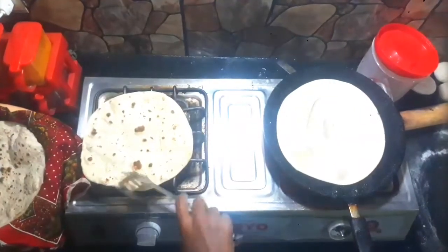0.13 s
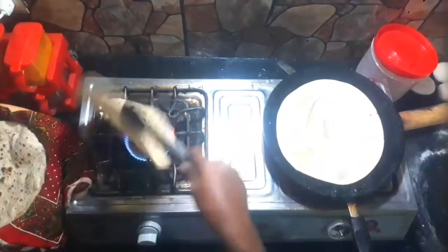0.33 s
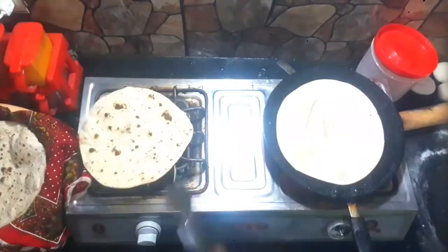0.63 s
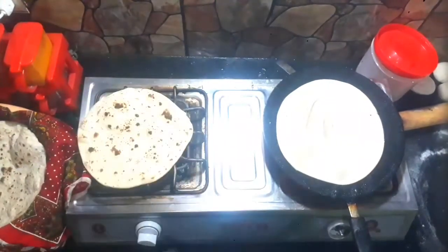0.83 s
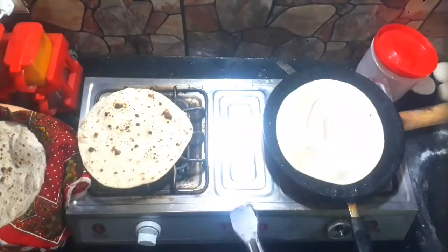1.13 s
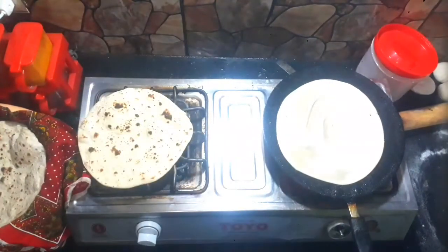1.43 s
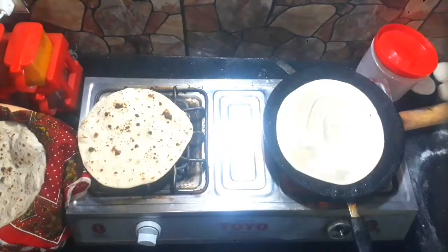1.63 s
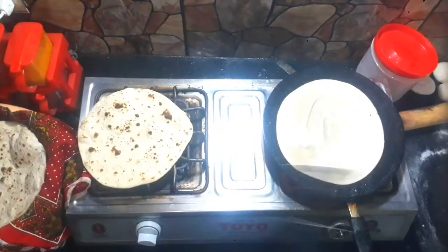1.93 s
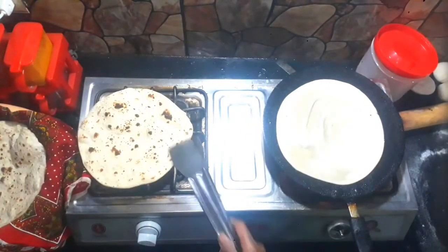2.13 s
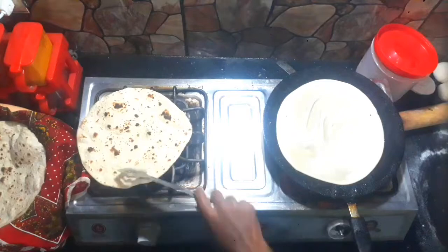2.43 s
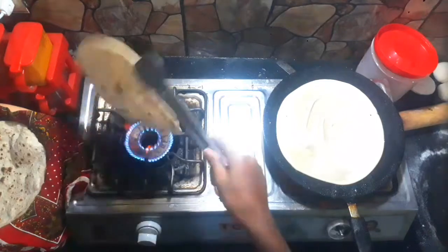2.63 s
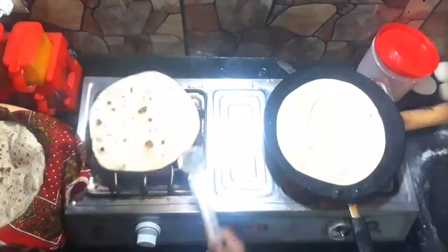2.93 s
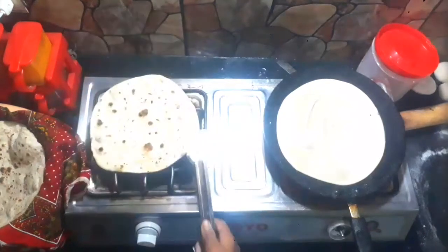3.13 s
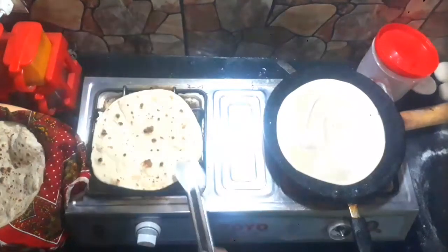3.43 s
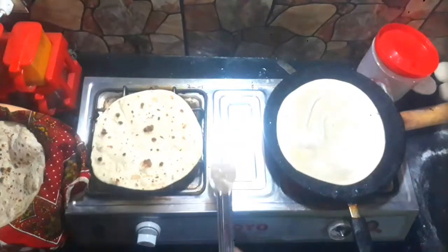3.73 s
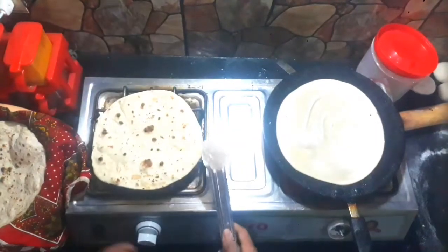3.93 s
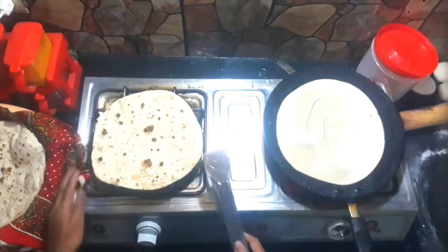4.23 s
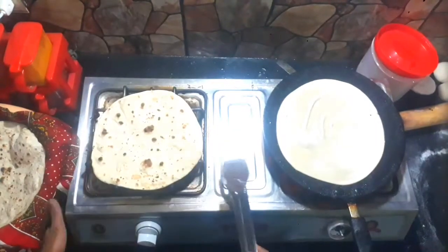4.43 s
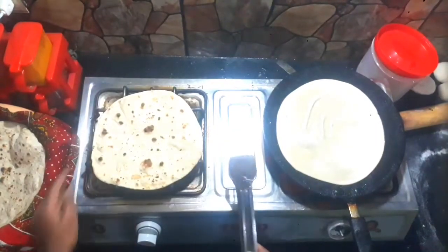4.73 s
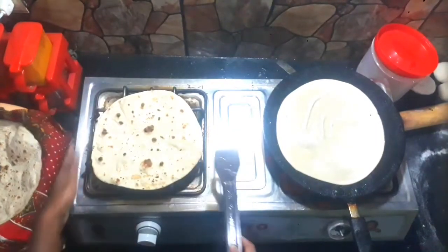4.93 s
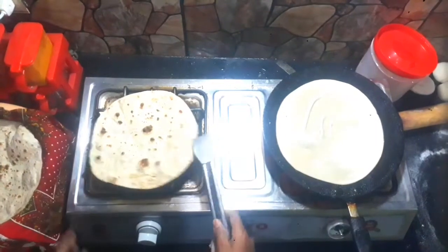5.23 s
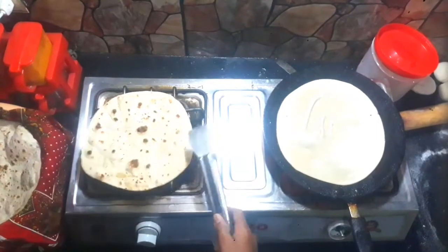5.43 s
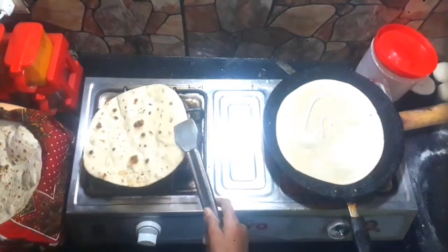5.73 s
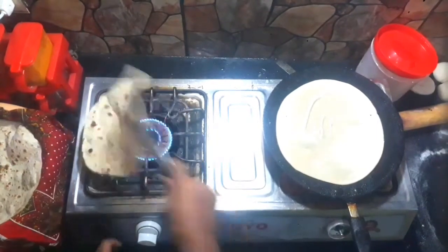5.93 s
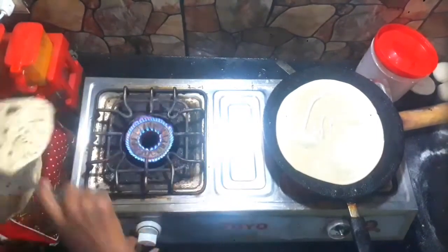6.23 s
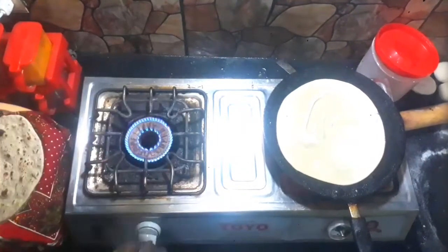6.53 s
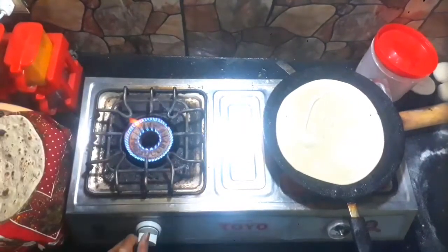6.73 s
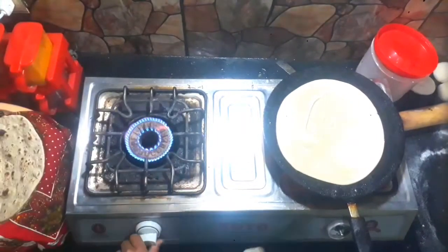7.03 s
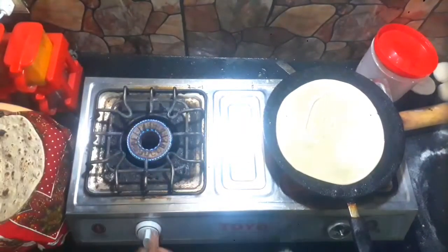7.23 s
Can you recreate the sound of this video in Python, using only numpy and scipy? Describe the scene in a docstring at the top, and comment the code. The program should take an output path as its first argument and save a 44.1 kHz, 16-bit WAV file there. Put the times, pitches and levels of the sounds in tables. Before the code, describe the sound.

In a small hard kitchen, steel tongs snip, tap and clatter on a sheet-metal stove over faint flame hiss, ending with hollow knocks.

```python
"""Steel tongs at a gas stove

Tongs tap the grate of a sheet-steel stove in a small hard-walled kitchen, snip and are laid down once;
blows are modal ringing plus shaped noise with a room tail. Ticks, bumps, rubs and nudges come between;
late on, the gas knob clicks and the stove is knocked. Filtered noise is the flame, a sine the faint hum.
A close double pop overloads the microphone; the gain control takes seconds to recover."""
import sys
import numpy as np
from scipy import signal
from scipy.fft import rfft, irfft, next_fast_len
from scipy.io import wavfile

SR = 44100
rng = np.random.default_rng(int(sys.argv[2]) if len(sys.argv) > 2 else 0)


def generate_wav(signal):
    """Clip the signal to [-1, 1] and save it as 16-bit WAV at the path in sys.argv[1]."""
    frames = np.transpose(np.atleast_2d(signal))
    scaled = np.clip(frames, -1, 1) * 32767
    pcm = np.round(scaled).astype(np.int16)
    wavfile.write(sys.argv[1], SR, pcm)


N = 325017
TIME = np.arange(N) / SR
AGE = np.arange(24000) / SR   # s since the start of one event


def from_db(db):
    """Decibels to gain."""
    return 10 ** (np.asarray(db) / 20)


def at_hz(points, hz):
    """Read a table on a log-frequency axis."""
    f, value = np.transpose(points)
    return np.interp(np.log(np.maximum(hz, 1)), np.log(f), value)


def dying(t60_s):
    """Exponential envelope that falls 60 dB in t60_s."""
    return np.exp(-np.log(1000) / t60_s * AGE)


def unit(x):
    """Scale a blow to the energy of 50 ms at rms 1."""
    return x / np.sqrt(np.sum(x ** 2) / (SR / 20) + 1e-20)


def band(x, hz, kind, order=2):
    """Butterworth filter."""
    return signal.sosfilt(signal.butter(order, hz, kind, fs=SR, output="sos"), x)


def add(out, s, sound):
    """Mix a sound in at time s, cut at the end of the scene."""
    at = round(s * SR)
    out[at:at + len(sound)] += sound[:N - at]


def reflections(count, depth=0.57, step_s=0.01082):
    """Random gain per partial for wall reflections that add and cancel: an uneven decay."""
    knots_s = np.arange(100) * step_s
    gains = 1 + depth * rng.standard_normal((count, len(knots_s)))
    return np.array([np.interp(AGE, knots_s, row) for row in gains])


def ringing(modes, spread_db, split=0.012, split_from_hz=2000):
    """One blow: modes of random strength and sign ring and decay; the high ones are detuned pairs."""
    hz, db, t60_s = np.transpose(modes)[:, :, None]
    sign = rng.choice([-1, 1], hz.shape)
    strength = sign * from_db(db + spread_db * rng.standard_normal(hz.shape))
    detune = split * (hz > split_from_hz) * rng.standard_normal((2, *hz.shape))
    swing = sum(np.sin(2 * np.pi * pair_hz * AGE) for pair_hz in hz * (1 + detune))
    partials = strength * swing * dying(t60_s) * reflections(len(modes))
    return unit(np.sum(partials, axis=0))


# kitchen tail: f/Hz, t60/s
ROOM_TAIL = [(200, 0.79), (600, 0.57), (1400, 0.61), (4000, 0.58), (9000, 0.41), (15000, 0.37)]


def crash(colour, direct, direct_t60_s, uneven_db=3.5, spacing_hz=22):
    """Crowded modes as unevenly coloured noise: a direct burst plus a room tail that dies band by band."""
    hz = np.arange(len(AGE) // 2 + 1) * SR / len(AGE)
    uneven = np.interp(hz / spacing_hz, np.arange(len(hz)), rng.standard_normal(len(hz)))
    gain = from_db(at_hz(colour, hz) + uneven_db * uneven)
    spectrum = rfft(rng.standard_normal(len(AGE))) * gain
    burst = direct * dying(direct_t60_s)
    centres_hz, t60s_s = np.transpose(ROOM_TAIL)
    total = np.zeros(len(AGE))
    for share, t60_s in zip(np.eye(len(ROOM_TAIL)), t60s_s):
        part = irfft(spectrum * np.interp(hz, centres_hz, share))   # overlapping triangular bands
        total += part * (burst + dying(t60_s))
    return unit(total)


def favour(hz, pitches_hz, spot_db=9.5, width=0.091):
    """dB lift of what rings near the pitches of the struck spot; width in ln(f)."""
    return spot_db * sum(np.exp(-(np.log(hz / pitch_hz) / width) ** 2) for pitch_hz in pitches_hz)


# stove panel modes: f/Hz, relative level/dB, t60/s
STOVE_MODES = [(166.7, -14, 0.2), (329.5, -10, 0.47), (352.7, 1, 0.49), (390.7, -4, 0.34), (437, 1, 0.54),
               (510, -10.5, 0.41), (545, -0.5, 0.53), (613, -0.5, 0.13), (639, 0, 0.41), (807, -4.5, 0.57),
               (854, -6.5, 0.5), (1000, -5, 0.39), (1118, -4.5, 0.39), (1213, -5, 0.23), (1392, -9.5, 0.44),
               (1470, -16, 0.25), (1572, -9.5, 0.42), (1640, -13, 0.34), (1840, -12, 0.18),
               (2005, -15, 0.84), (2525, -24, 0.37), (2470, -22, 0.254), (3310, -16.5, 0.3),
               (4090, -11.5, 0.41), (5280, -10, 0.48), (5070, -20.5, 0.64), (6500, -36, 0.23),
               (7060, -16.5, .35), (8660, -22, 0.39), (9700, -18, 0.29)]
# crowded stove modes, spectrum: f/Hz, relative level/dB
STOVE_COLOUR = [(59, -65), (100, -12), (177, -7), (258, -12), (340, 1), (457, -10.5), (627, 2.5),
                (697, -5.5), (998, -6), (2930, -20), (6660, -25.5), (8230, -26.5), (10600, -23),
                (15500, -40.5)]


def panel_blow(pitches_hz, ring_db, knock, knock_t60_s=0.32, crowd_share=0.58):
    """Sheet steel answers with crowded and single modes, strongest at the start."""
    hz, db, t60_s = np.transpose(STOVE_MODES)
    modes = np.transpose([hz, db + favour(hz, pitches_hz), t60_s])
    grid_hz = np.geomspace(50, 16000, 300)
    colour_db = at_hz(STOVE_COLOUR, grid_hz) + crowd_share * favour(grid_hz, pitches_hz)
    crowd = crash(np.transpose([grid_hz, colour_db]), direct=0.47, direct_t60_s=0.09)
    blow = crowd + from_db(ring_db) * ringing(modes, spread_db=2.0)
    return blow * (1 + knock * dying(knock_t60_s))


def contact(blow, hardness_db, edge_db, body_hz=800, edge_hz=3100, swell_s=0.0055,
            clank_swell=0.3, edge_per_hardness=1.21):
    """Harder contact raises the grate's clank, and the bright edge even more, over the panel's body."""
    swell = 1 - np.exp(-AGE / swell_s)   # bending waves take a moment to fill the panel
    body = unit(band(blow * swell, body_hz, "low", order=4))
    clank = unit(band(blow * swell ** clank_swell, [body_hz, edge_hz], "band", order=3))
    edge = unit(band(blow, edge_hz, "high", order=4))
    edge_gain = from_db(edge_db + edge_per_hardness * hardness_db)
    return body + from_db(hardness_db) * clank + edge_gain * edge


# flame and room hiss, spectrum: f/Hz, relative level/dB
HISS_COLOUR = [(20, -21), (40, -3.5), (80, -1.5), (140, -4.5), (220, -5.5), (400, -6), (575, -9.5),
               (1230, -13), (2020, -15), (6370, -21.5), (8060, -26.5), (9800, -27), (11900, -22),
               (15500, -24)]
# faint hum before gain control: t/s, rms level/dB
HUM_LEVEL = [(1.5, -83), (2.59, -70), (3.7, -70), (3.76, -63), (4.47, -63), (4.68, -79), (4.74, -65),
             (5.37, -67), (5.75, -77)]


def flame_and_hum(hiss_db=-57, hum_hz=57.8, waver_rad=0.23, waver_hz=8):
    """Steady shaped noise of burner and room; a low sine with wavering phase and changing level."""
    size = 2 * next_fast_len(N // 2 + 1, real=True)
    hz = np.arange(size // 2 + 1) * SR / size
    hiss = irfft(rfft(rng.standard_normal(size)) * from_db(at_hz(HISS_COLOUR, hz)))[:N]
    slow = band(rng.standard_normal(N), waver_hz, "low")
    hum = np.sqrt(2) * np.sin(2 * np.pi * hum_hz * TIME + waver_rad * slow / slow.std())
    hum_db = np.interp(TIME, *np.transpose(HUM_LEVEL))
    return from_db(hiss_db) * hiss / hiss.std() + from_db(hum_db) * hum


# light metal contact, spectrum: f/Hz, relative level/dB
CLICK_COLOUR = [(400, -21), (1500, 3.5), (3000, -1.5), (4500, 0), (6500, 2), (11000, 1.5), (15500, 0.5)]


def small_clicks(rows, modes, ring_db, direct):
    """Light metal contacts: a sharp tick and a thin ring."""
    out = np.zeros(N)
    for s, db in rows:
        tick = crash(CLICK_COLOUR, direct, direct_t60_s=0.019)
        ring = from_db(ring_db) * ringing(modes, spread_db=5.5)
        add(out, s, from_db(db) * (tick + ring))
    return out


# tong tips touch: t/s, level/dB
TIP_TOUCHES = [(.647, -45), (.74, -49), (2.464, -43.5), (5.297, -51), (5.853, -53.5), (6.34, -64),
               (6.385, -64.5)]
# tong modes, also for laying down: f/Hz, relative level/dB, t60/s
TONG_MODES = [(3390, 11.5, 0.29), (4120, 15.5, 0.244), (5270, -12, 0.227), (6190, 18, 0.33),
              (6300, 9, 0.36), (6612, 20, 0.23), (6700, -2.5, 0.9), (6700, 3, 0.26), (7030, -23, 0.153),
              (7030, 1, 0.68), (7960, -11, 0.81), (8350, -15, 0.244), (9600, 6, 0.22), (10570, 17.5, 0.39),
              (11640, 16, 0.19)]


def tong_snips():
    """The tips of the tongs touch: a tick and the arms' thin ring."""
    return small_clicks(TIP_TOUCHES, TONG_MODES, ring_db=-11, direct=2.2)


# tongs on stove: t/s, level/dB, hardness/dB, panel f/Hz, tong f/Hz, second arm delay/s, its relative level/dB
STOVE_TAPS = [(.652, -43.5, -12, 534, 7300, .037, 5.5), (.775, -44, 9, 1670, 8800, .004, -20),
              (2.445, -38, -2, 1023, 6760, .019, 2.5), (2.914, -52, -3, 388, 6600, .061, -2.5),
              (3.467, -53.5, 2, 1110, 6600, .02, -11), (5.509, -43.5, -0.5, 1200, 3260, .068, -6.5),
              (5.852, -46, 0, 514, 4780, .008, 2.5)]


def stove_taps():
    """The two arms of the tongs strike the same spot one after the other."""
    out = np.zeros(N)
    for s, db, hardness_db, panel_hz, tong_hz, gap_s, second_db in STOVE_TAPS:
        for at_s, arm_db in ((s, db), (s + gap_s, db + second_db)):
            blow = panel_blow([panel_hz, tong_hz], ring_db=2.5, knock=0.32)
            add(out, at_s, from_db(arm_db) * contact(blow, hardness_db, edge_db=-7.0))
    return out


# close double pop: t/s, level/dB
DOUBLE_POP = [(.702, -12.5), (0.7061, 2.5)]
# damped pop swings: f/Hz, relative level/dB, t60/s
POP_SWINGS = [(130, -18, .028), (270, -5, 0.005), (490, -2, .0065), (1000, -10.5, .004),
              (2550, -14, 0.0037), (3700, -21, .005)]


def pops(flutter_hz=727, flutter_after_s=0.015, flutter_width_s=0.007, flutter_db=-32,
         rattle_db=3, rattle_hz=3200, crack_db=-18, crack_hz=9000, crack_t60_s=0.004, low_cut_hz=139.6):
    """Each pop is a crack, heavily damped swings and a rattle that swells and dies."""
    out = np.zeros(N)
    swings = sum(from_db(db) * np.sin(2 * np.pi * hz * AGE) * dying(t60_s) for hz, db, t60_s in POP_SWINGS)
    swell = from_db(flutter_db) * np.exp(-((AGE - flutter_after_s) / flutter_width_s) ** 2)
    flutter = np.sin(2 * np.pi * flutter_hz * AGE)
    for s, db in DOUBLE_POP:
        noise = rng.standard_normal(len(AGE))
        crack = from_db(crack_db) * band(noise, crack_hz, "low", order=1) * dying(crack_t60_s)
        rattle = flutter + from_db(rattle_db) * band(noise, rattle_hz, "low", order=4)
        add(out, s, from_db(db) * (crack + swings + rattle * swell))
    return band(out, low_cut_hz, "high")


# landing of each tong arm: t/s, level/dB
ARM_LANDINGS = [(1.1311, -26.5), (1.153, -28.5)]
# clash of the laid tongs, spectrum: f/Hz, relative level/dB
CLASH_COLOUR = [(71, -59), (120, -23.5), (216, -27), (312, -23), (360, -16), (519, -18), (649, -6),
                (704, -8), (1120, -16), (1220, -17), (2590, -21), (2980, -19.5), (5610, -19), (6870, -13.5),
                (15500, -24.5)]
# modes of the stove front under the laid tongs: f/Hz, relative level/dB, t60/s
STOVE_FRONT_MODES = [(361, 0.5, 0.56), (386, 1.5, 0.38), (490, -11.5, 0.57), (650, 0, 0.53),
                     (648, 9.5, 0.33), (702, -6, 0.36), (720, -14, 0.79), (885, -16, 0.24),
                     (1235, 0.5, 0.17), (1464, -5, 0.23)]


def tongs_laid_down(crash_db=-2, stove_front_db=0, steel_db=-9, swell_s=0.015):
    """Both arms clash and ring; the stove front under them swells into one low ring."""
    out = np.zeros(N)
    for s, db in ARM_LANDINGS:
        clash = from_db(crash_db) * crash(CLASH_COLOUR, direct=0.86, direct_t60_s=0.15)
        steel = from_db(steel_db) * ringing(TONG_MODES, spread_db=2)
        add(out, s, from_db(db) * (clash + steel))
    s, db = ARM_LANDINGS[0]
    low_ring = ringing(STOVE_FRONT_MODES, spread_db=0.0) * (1 - np.exp(-AGE / swell_s))
    add(out, s, from_db(db + stove_front_db) * unit(low_ring))
    return out


def damped(hz, t60_s, crack_db, crack_hz=3000):
    """A heavily damped pressure swing with a short noise crack."""
    crack = from_db(crack_db) * band(rng.standard_normal(len(AGE)), crack_hz, "low")
    return (np.sin(2 * np.pi * hz * AGE) + crack) * dying(t60_s)


# dry ticks: t/s, level/dB, f/Hz
DRY_TICKS = [(1.461, -36.5, 1230), (1.8, -48, 2400), (2.436, -38, 2550), (7.324, -48, 2420)]


def dry_ticks(t60_s=0.02):
    """Small handling ticks, a damped swing with a crack, that set nothing ringing."""
    out = np.zeros(N)
    for s, db, hz in DRY_TICKS:
        add(out, s, from_db(db) * damped(hz, t60_s, crack_db=0))
    return out


# faint rubs: peak t/s, half length/s, level/dB, f/Hz
RUBS = [(2.0, 0.054, -62, 1200), (2.92, .04, -54, 1400), (3.919, .025, -59.5, 1200),
        (4.419, 0.032, -62.5, 1050), (4.851, 0.032, -68, 5950), (6.362, .04, -63, 2170)]


def rustles(width=1.18):
    """Each rub is a brief swell of friction noise around one pitch."""
    out = np.zeros(N)
    middle_s = AGE[-1] / 2
    for s, half_s, db, hz in RUBS:
        rub = band(rng.standard_normal(len(AGE)), [hz / width, hz * width], "band")
        swell = np.exp(-((AGE - middle_s) / half_s) ** 2)
        add(out, s - middle_s, from_db(db) * rub / rub.std() * swell)
    return out


# dull bumps: t/s, level/dB
DULL_BUMPS = [(2.159, -41), (5.82, -33.5)]


def dull_bumps(hz=186, t60_s=0.028):
    """Soft handling bumps: a low damped swing with little crack."""
    out = np.zeros(N)
    for s, db in DULL_BUMPS:
        add(out, s, from_db(db) * damped(hz, t60_s, crack_db=-25))
    return out


# faint pushes on the stove: t/s, level/dB, panel f/Hz
STOVE_NUDGES = [(3.91, -58.5, 690), (4.255, -60.5, 398), (4.896, -56.5, 350), (5.195, -58, 648)]


def stove_nudges(width=1.5):
    """A light push wakes mainly the panel modes around one pitch."""
    out = np.zeros(N)
    for s, db, hz in STOVE_NUDGES:
        blow = panel_blow([hz], ring_db=11, knock=0.067)
        add(out, s, from_db(db) * unit(band(blow, [hz / width, hz * width], "band")))
    return out


# gas knob clicks: t/s, level/dB
GAS_KNOB_CLICKS = [(6.802, -51.5), (7.047, -52.5)]
# knob modes: f/Hz, relative level/dB, t60/s
KNOB_MODES = [(3200, 5, 0.16), (5260, -7, .22), (6000, -13, 0.12), (7150, 19, 0.14), (7150, 1, 0.45),
              (7330, -4.5, 0.13), (10580, 2, 0.34), (11200, -2, 0.26), (12260, 0, 0.34), (12300, -11, .2),
              (13440, -14, .2)]


def knob_clicks():
    """The gas knob clicks: a sharp tick and a thin high ring."""
    return small_clicks(GAS_KNOB_CLICKS, KNOB_MODES, ring_db=-1.5, direct=2.1)


# blunt knocks: t/s, level/dB, hardness/dB, panel f/Hz
STOVE_KNOCKS = [(6.898, -33, -2, 382), (6.979, -54.5, 4, 1560), (7.349, -35.5, -13.5, 360)]


def stove_knocks(boom_hz=162, boom_t60_s=0.23, boom_db=-14):
    """A blunt blow shakes the panel and booms in the stove's hollow body, but has little edge."""
    out = np.zeros(N)
    boom = from_db(boom_db) * unit(np.sin(2 * np.pi * boom_hz * AGE) * dying(boom_t60_s))
    for s, db, hardness_db, panel_hz in STOVE_KNOCKS:
        blow = panel_blow([panel_hz], ring_db=-1, knock=1.0)
        add(out, s, from_db(db) * (contact(blow, hardness_db, edge_db=-15) + boom))
    return out


def scene():
    """All sources summed at one microphone."""
    tongs = tong_snips() + stove_taps() + tongs_laid_down()
    handling = dry_ticks() + rustles() + dull_bumps()
    stove = stove_nudges() + knob_clicks() + stove_knocks()
    return (flame_and_hum() + tongs + pops() + handling + stove)[None]


def record(dry, threshold_db=-11, recover_db_per_s=2.0, top=0.6, cutoff_hz=15700):
    """Peaks clip; the gain drops after an overload and creeps back; the treble is cut steeply."""
    clipped = np.clip(dry, -top, top)
    over_db = np.maximum(20 * np.log10(np.abs(clipped) + 1e-9) - threshold_db, 0)
    recovery_db = recover_db_per_s * TIME
    held_db = np.maximum.accumulate(over_db + recovery_db, axis=-1) - recovery_db
    levelled = clipped * from_db(-band(held_db, 4.5, "low", order=1))
    return signal.sosfilt(signal.ellip(10, 0.1, 80, cutoff_hz, fs=SR, output="sos"), levelled)


dry = scene()
out = record(dry)
generate_wav(out)
```